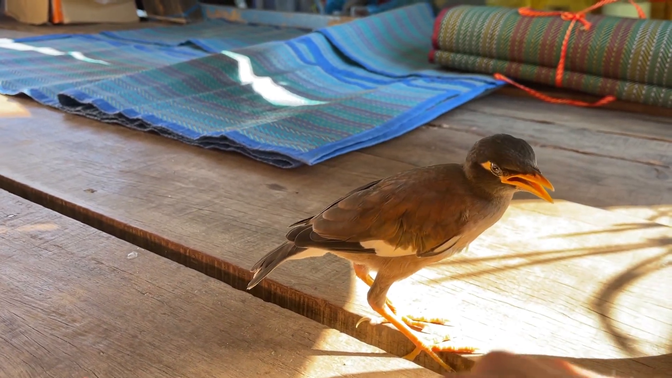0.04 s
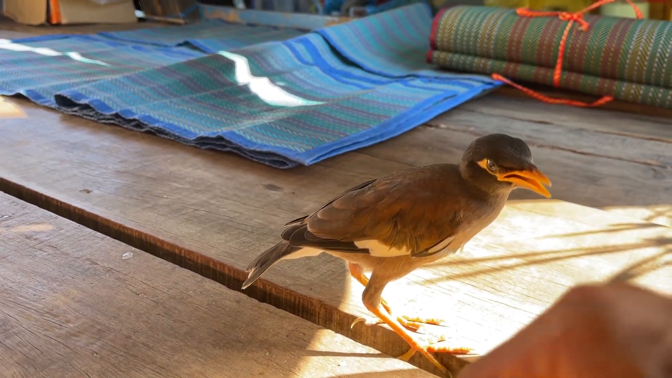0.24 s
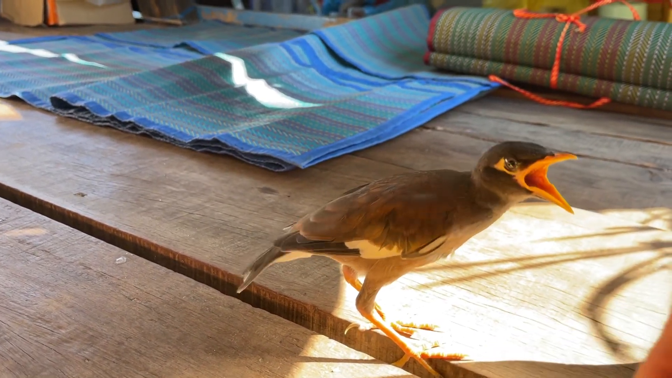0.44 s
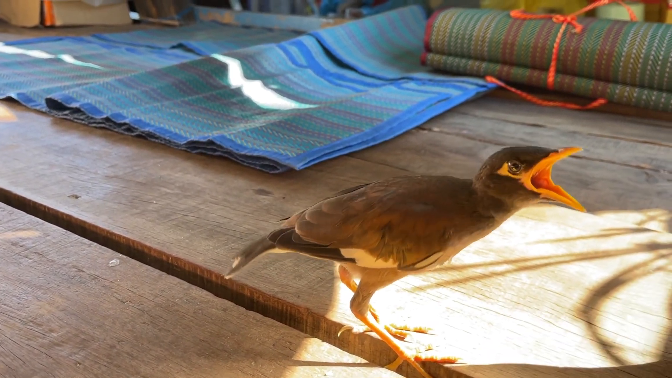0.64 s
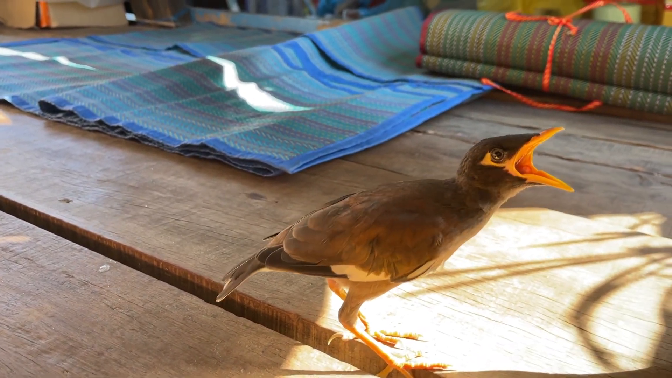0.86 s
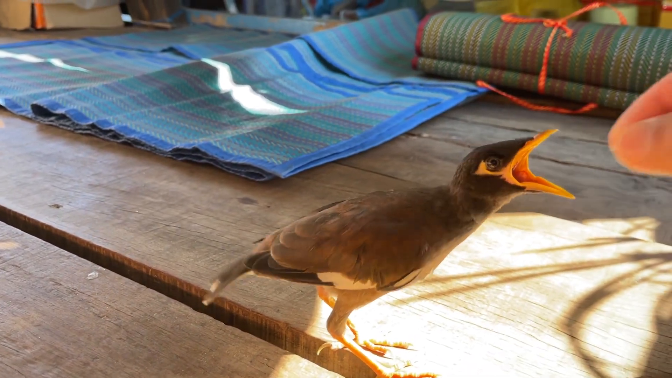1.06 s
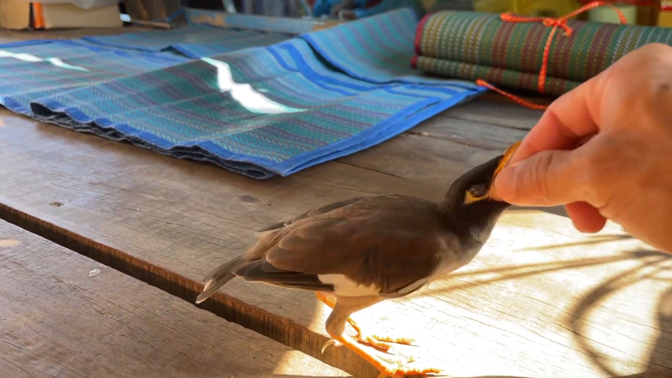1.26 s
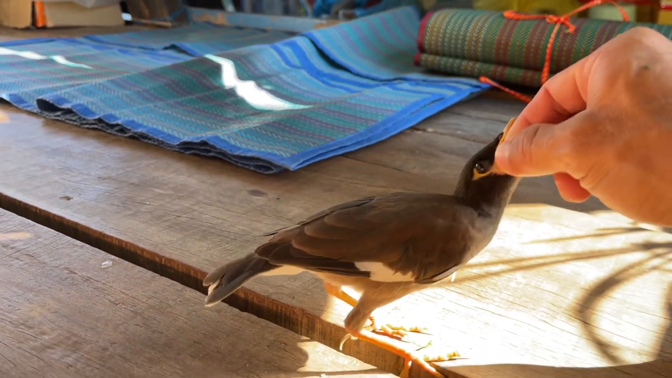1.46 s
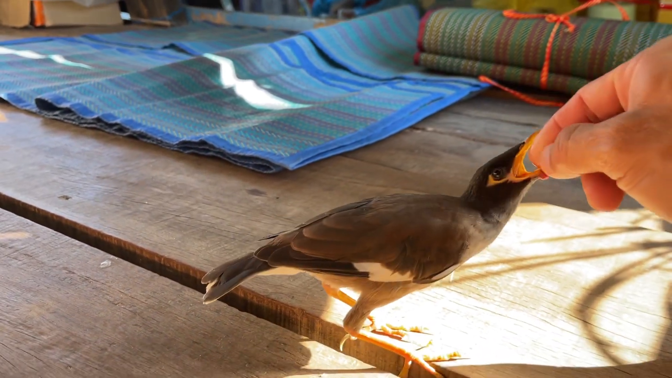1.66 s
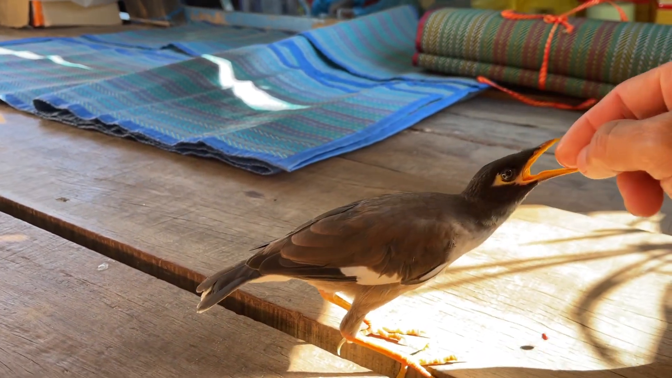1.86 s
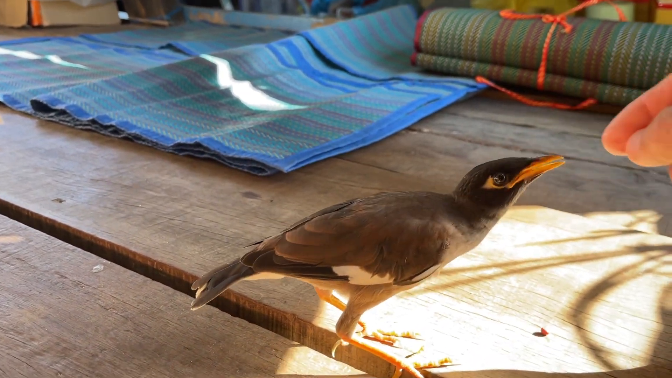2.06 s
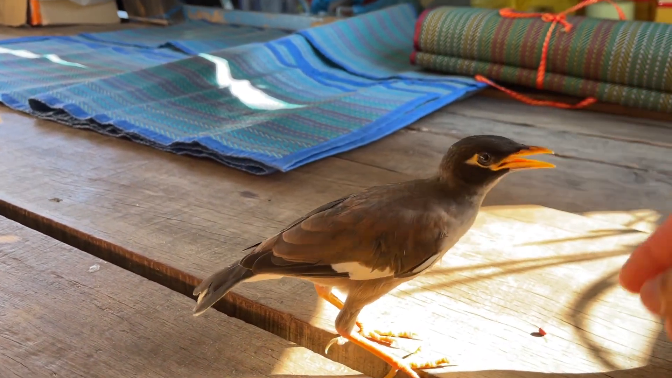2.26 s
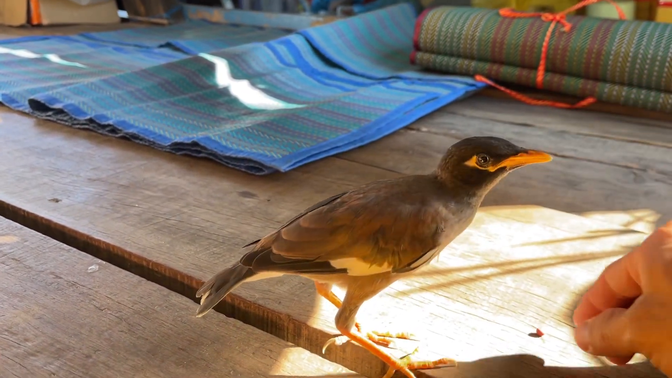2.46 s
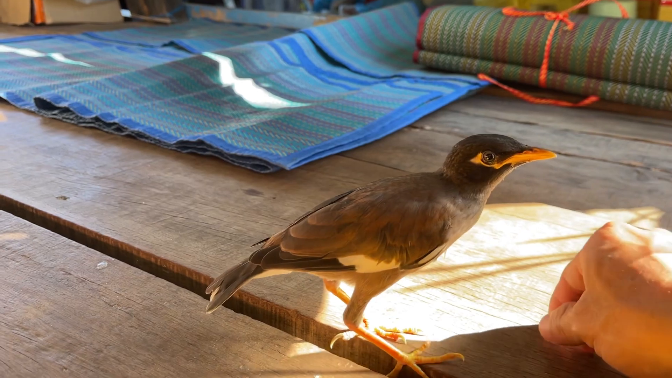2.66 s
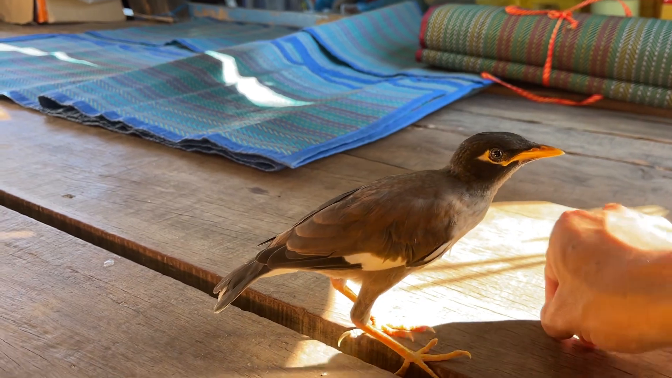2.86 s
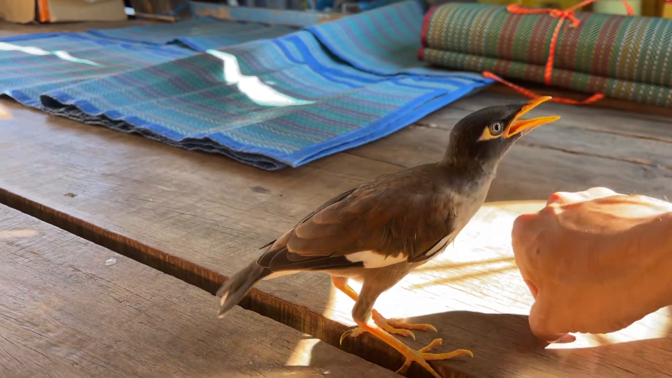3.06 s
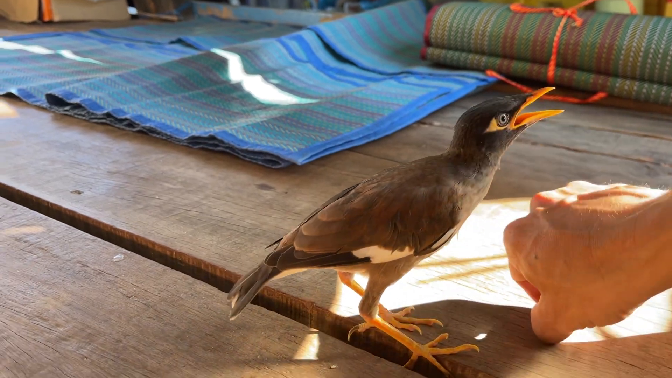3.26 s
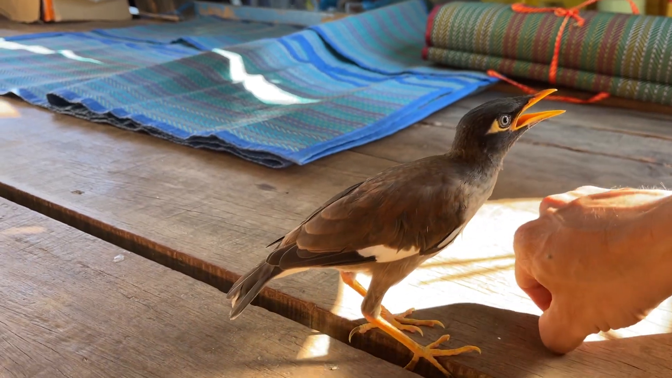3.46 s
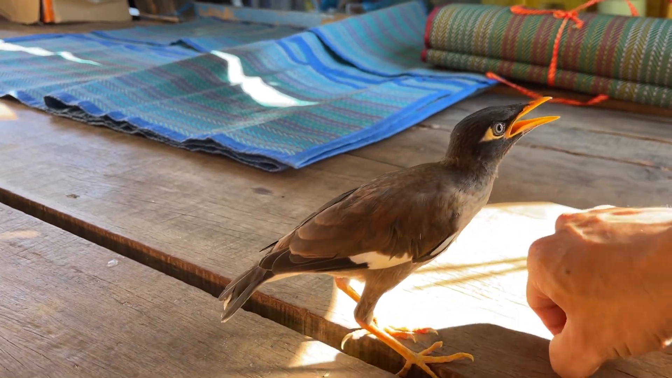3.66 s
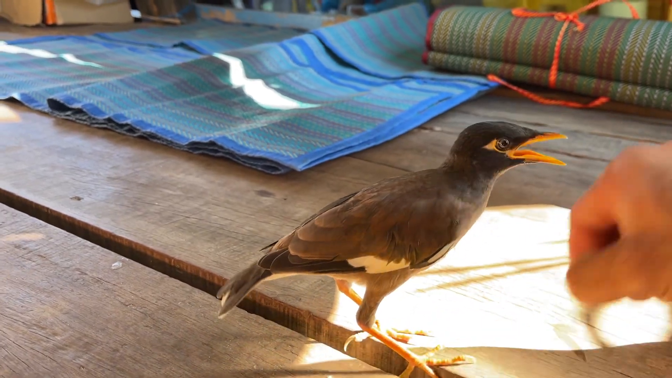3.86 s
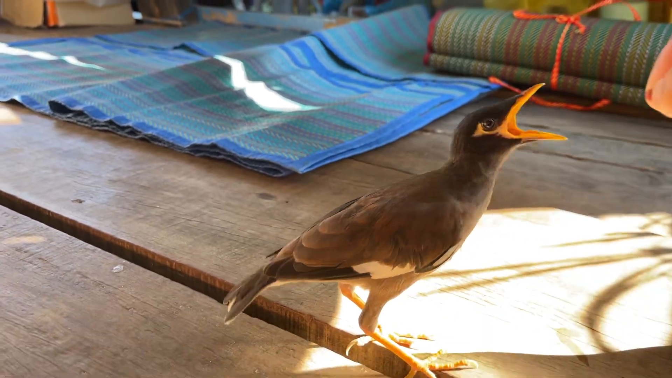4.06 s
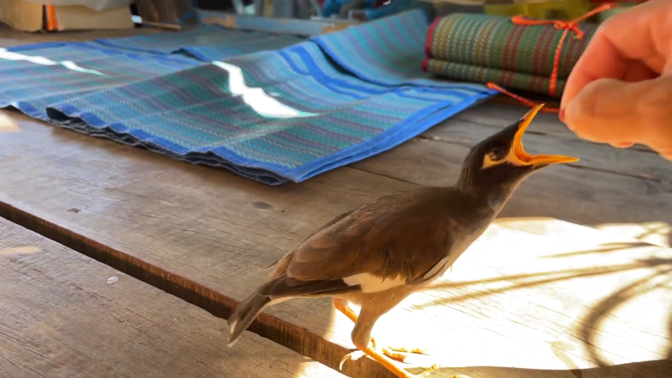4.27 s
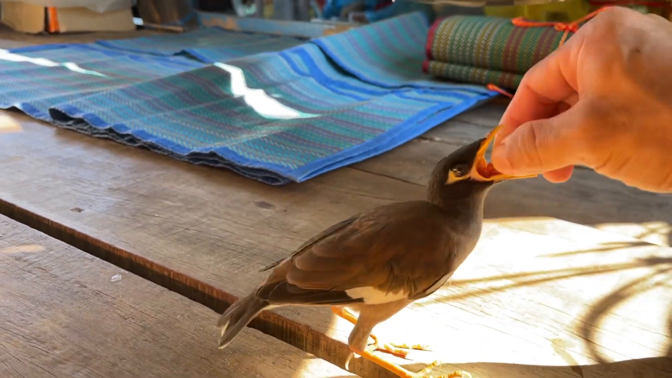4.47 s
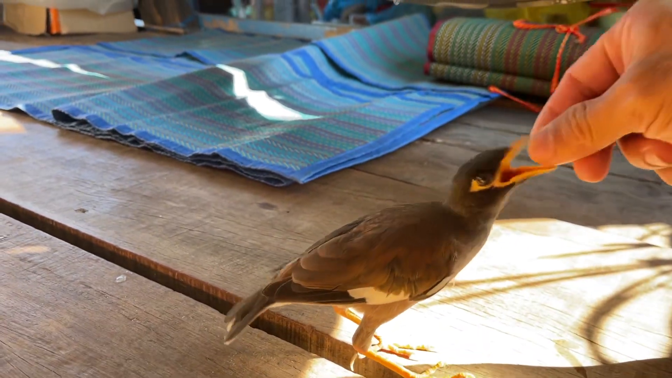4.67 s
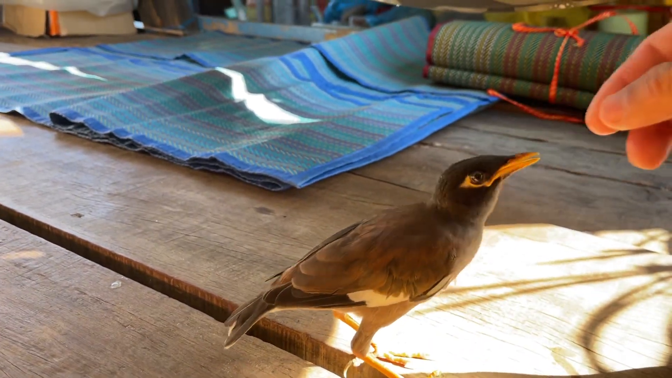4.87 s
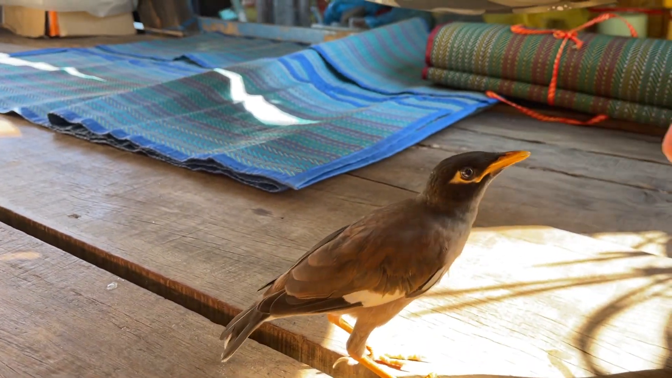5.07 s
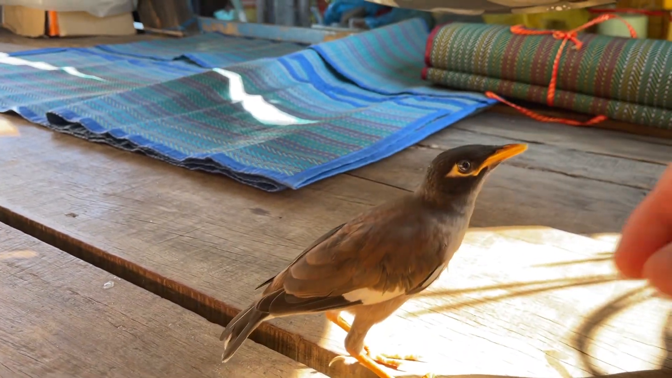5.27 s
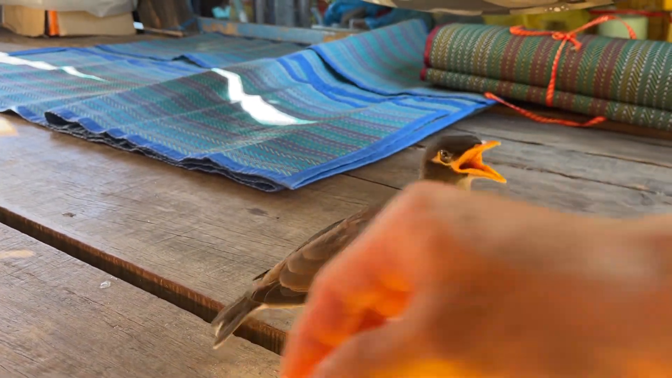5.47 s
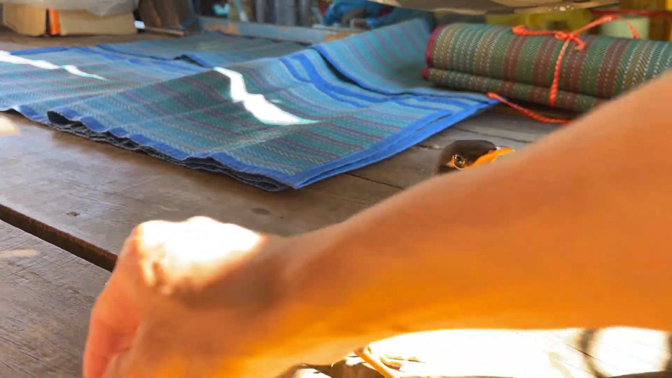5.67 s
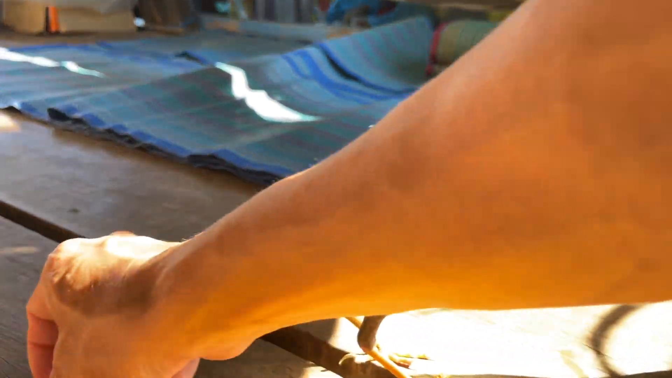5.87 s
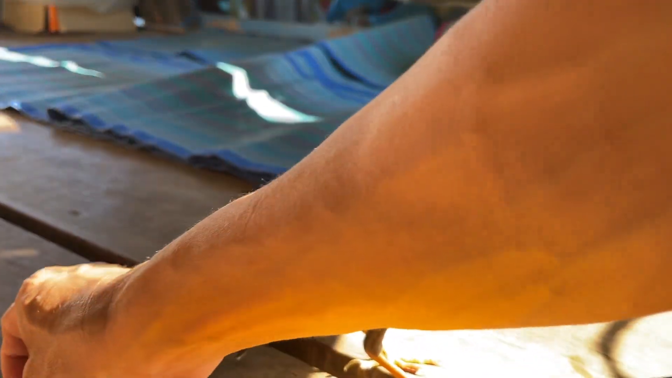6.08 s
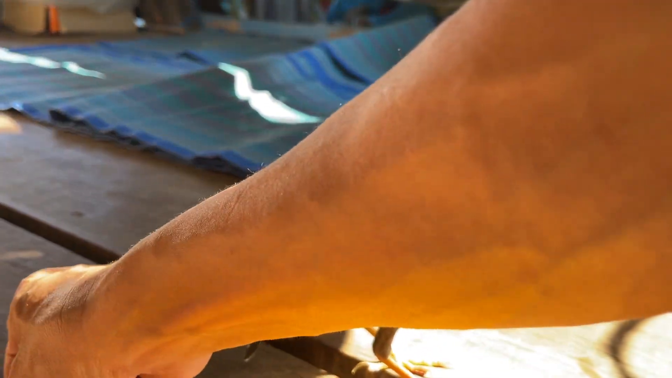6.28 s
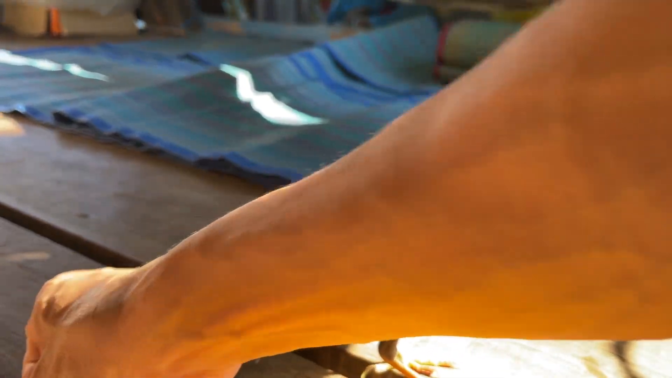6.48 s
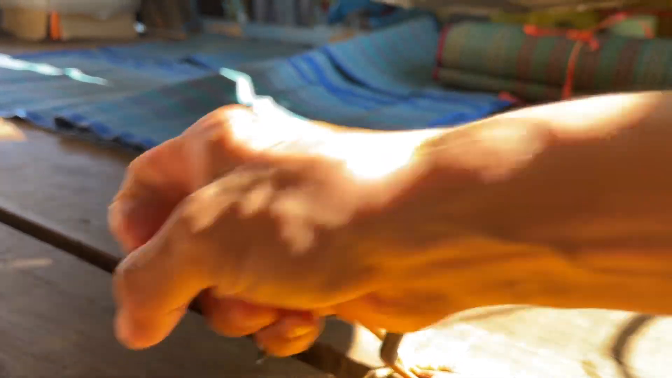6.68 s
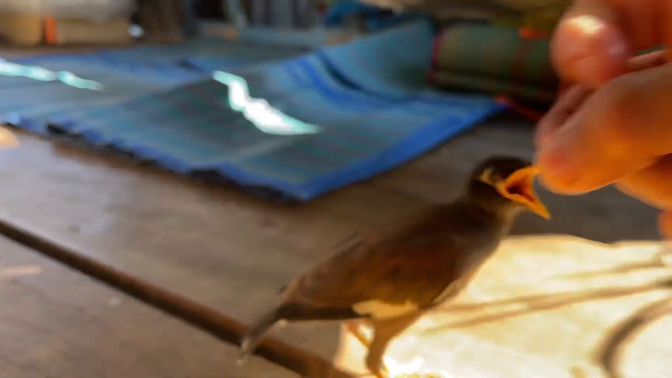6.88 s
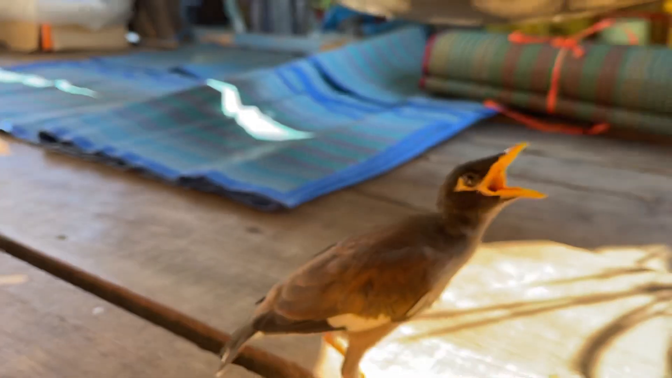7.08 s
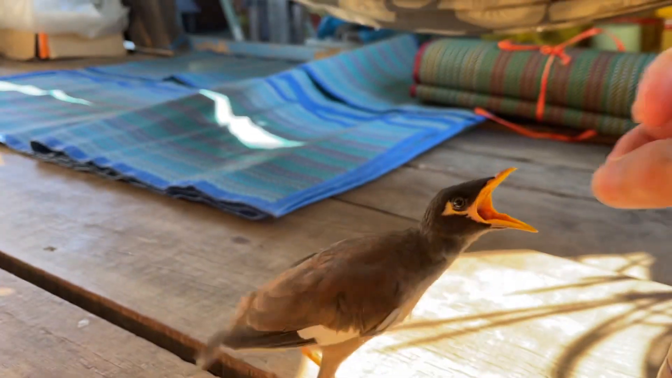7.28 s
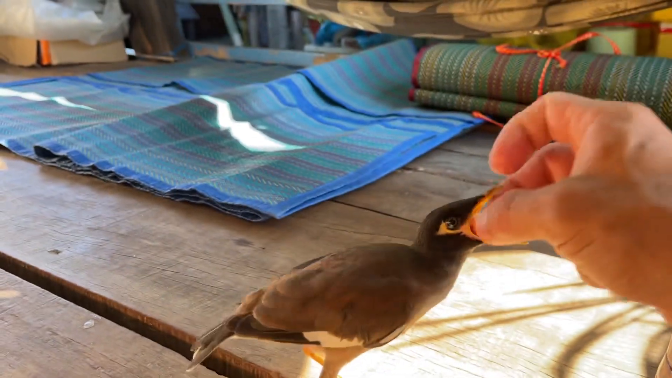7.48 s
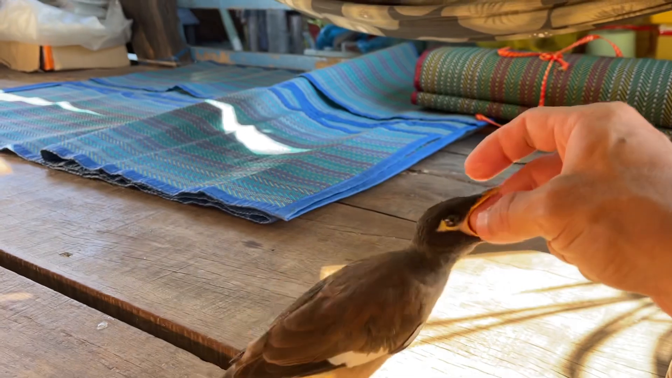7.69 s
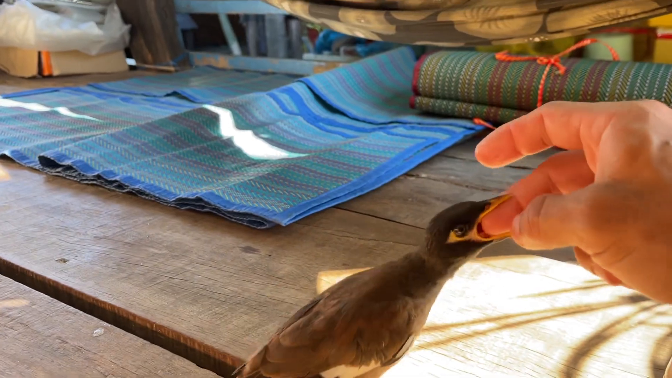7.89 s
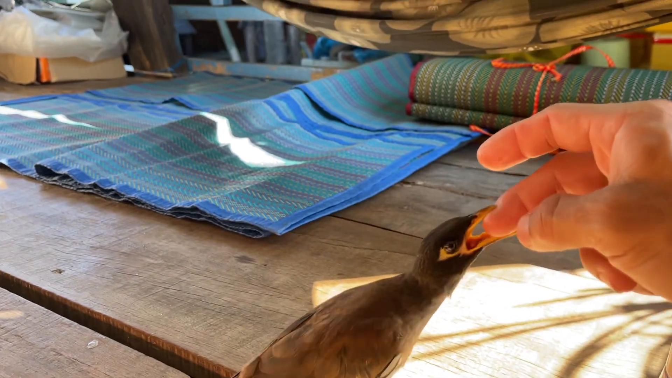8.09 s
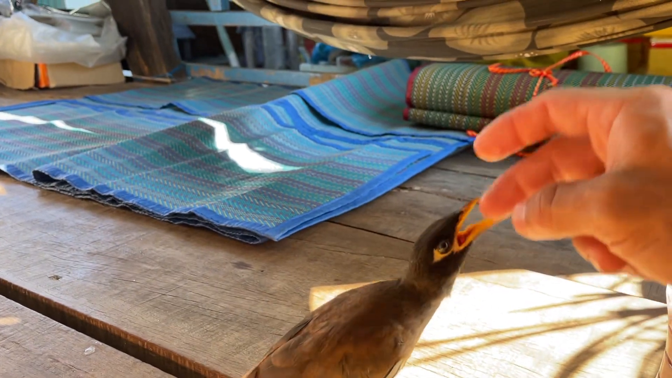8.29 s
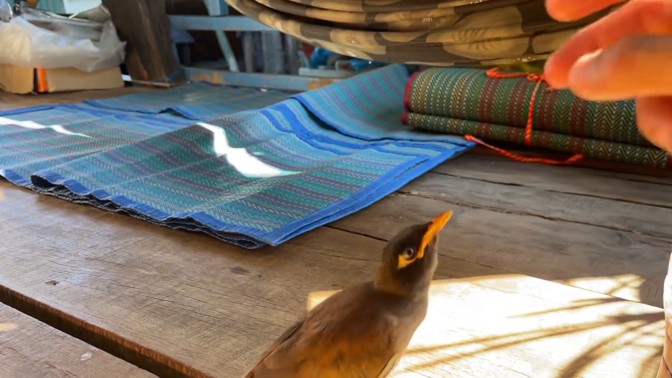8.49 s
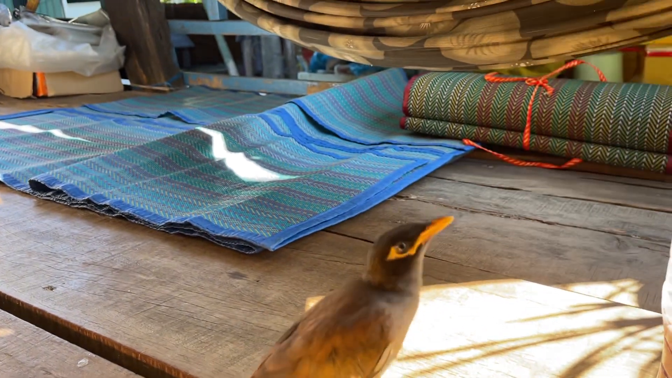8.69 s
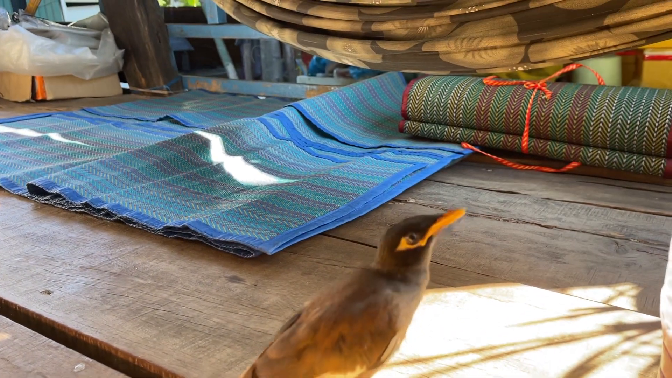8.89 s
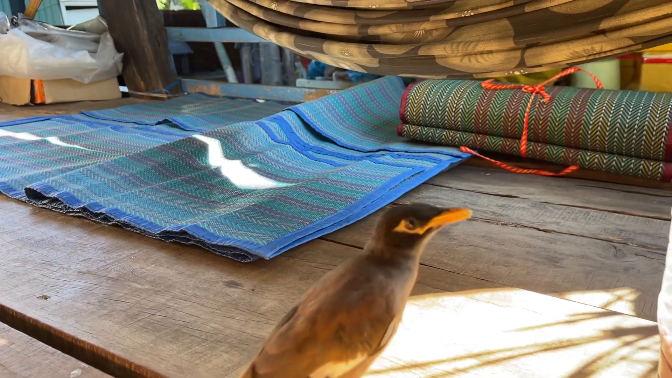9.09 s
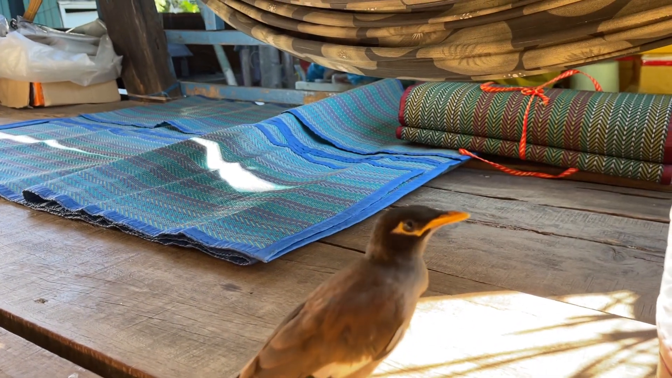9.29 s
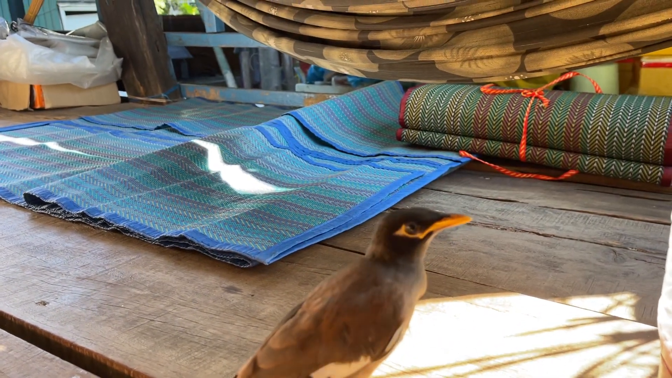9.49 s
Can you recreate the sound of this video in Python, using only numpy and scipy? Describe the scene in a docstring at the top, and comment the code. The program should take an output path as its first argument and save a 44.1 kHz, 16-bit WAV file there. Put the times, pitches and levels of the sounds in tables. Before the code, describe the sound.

A begging bird close to the microphone gives short, harsh, rasping chirps, each a fast double-arched squawk ending in a brief whistle. They come in hurried runs separated by short gaps. Between early runs, one sharp tick and soft brushing come from a hand on wooden boards. The calls stop after about seven and a half seconds, except one weak late peep. A low distant rumble lies beneath in a dry, open wooden room.

```python
"""A wooden floor in an open room, where a myna begs for food in quick runs of short rasping calls.
Each call is one double-arched gesture of two sine voices, the two sides of its syrinx.
They clash into sum tones, and filtered noise chopped by their beat adds the rasp.
Between the runs a feeding hand makes sharp ticks and soft brushes, both from shaped noise bursts.
Behind lie an outdoor rumble of coloured noise and faint far-off whistles of gliding sines."""
import sys
import numpy as np
from scipy import signal
from scipy.fft import rfft, irfft
from scipy.io import wavfile

SR = 44100
rng = np.random.default_rng(int(sys.argv[2]) if len(sys.argv) > 2 else 0)


def wav_out(sig):
    """Save sig, one row per channel (or a flat mono array), as 16-bit PCM at SR to the path in sys.argv[1]."""
    wavfile.write(sys.argv[1], SR, np.round(np.clip(np.atleast_2d(sig).T, -1, 1) * 32767).astype(np.int16))


N = 420713  # length in samples


def amp(db):
    """Decibels to gain."""
    return 10 ** (np.asarray(db) / 20)


def unit(x):
    """Scales to rms 1."""
    return x / np.sqrt(np.mean(x ** 2) + 1e-20)


def read(points, hz):
    """Reads a table on a log-frequency axis."""
    f, value = np.transpose(points)
    return np.interp(np.log(hz + 1), np.log(f + 1), value)


def add(mix, start_s, sound):
    """Mixes a sound in at a time."""
    part = mix[round(start_s * SR):][:len(sound)]
    part += sound[:len(part)]


def noise(count, shape):
    """Noise of rms 1: a white spectrum multiplied by shape(Hz)."""
    spectrum = rfft(rng.standard_normal(count))
    return unit(irfft(spectrum * shape(np.fft.rfftfreq(count, 1 / SR)), count))


def band(hz, width_hz):
    """The spectral shape of one broad resonance."""
    return lambda f: 1 / (1 + (2 * (f - hz) / width_hz) ** 2)


def wobble(count, rate_hz):
    """Random drift of rms 1, up to about the given rate."""
    return noise(count, lambda f: 1 / (1 + (f / rate_hz) ** 4))


# The colour of the background. Each row: frequency in Hz, density in dB per Hz before overall scaling.
AIR_COLOUR = [(20, -27.5), (33, -11), (47, 4.5), (62, 1), (130, -2.5), (250, -8.5), (400, -16.5),
              (600, -23.5), (1100, -25.5), (2000, -32), (4000, -41), (7000, -42.5), (9600, -46.5),
              (11200, -28), (11600, -42.5), (11900, -72.5)]
# How alike the background is in both ears. Each row: frequency in Hz, left-right likeness (1 = identical).
AIR_LIKENESS = [(50, 0.97), (220, 0.97), (450, 0.62), (900, 0.095), (2500, 0.44), (7000, 0.11), (8500, 1),
                (11500, 0.98)]
AIR_DB = -50.5


def background(thrum_db=-47, thrum_hz=42):
    """Distant rumble under faint hiss, as partly shared stereo noise; a deep thrum fades out early."""
    hz, t = np.fft.rfftfreq(N, 1 / SR), np.arange(N) / SR
    left, other = rfft(rng.standard_normal((2, N)))
    same = np.clip(read(AIR_LIKENESS, hz), -1, 1)
    right = same * left + np.sqrt(1 - same ** 2) * other
    air = unit(irfft(np.array([left, right]) * amp(read(AIR_COLOUR, hz)), N))
    # the level drifts a little and sinks gently through the middle
    air_db = AIR_DB + .6 * wobble(N, 4.1) + np.interp(t, [3, 8], [.8, -.8])
    thrum = noise(N, lambda f: band(thrum_hz, 16)(f) ** 2)
    thrum *= np.interp(t, [.2, .6], [1, 0])
    return air * amp(air_db) + amp(thrum_db) * thrum


def whistles(rows, waver=.015, flutter_db=3):
    """Thin sines that glide, waver in pitch and flutter in level."""
    out = np.zeros(N)
    for start_s, length_s, db, start_hz, end_hz in rows:
        count = int(length_s * SR)
        hz = np.linspace(start_hz, end_hz, count) * (1 + waver * wobble(count, 56))
        level = amp(db + flutter_db * wobble(count, 25)) * signal.windows.tukey(count, .7)
        add(out, start_s, level * np.sin(2 * np.pi * np.cumsum(hz) / SR))
    return out


# Faint whistles and a hoot. Each row: start in seconds, length in seconds, level in dB,
# start pitch in Hz, end pitch in Hz.
FAR_CALLS = [(6.45, 0.33, -77, 2930, 2970), (8.86, 0.29, -70, 687, 674), (8.93, 0.21, -71, 1190, 1192),
             (9.15, .39, -79.5, 2946, 2960), (9.17, 0.27, -84.5, 5850, 6020)]


def far_calls():
    """Far-off whistles and a hoot: faint gliding sines with a strong flutter."""
    return whistles(FAR_CALLS, waver=0.012, flutter_db=6.5)


# Claws, fingers and food on the boards. Each row: start in seconds, level in dB before the decay,
# centre in Hz, width in Hz, decay in seconds.
TICKS = [(1.858, -38.5, 6850, 9100, 0.0027), (2.411, -54, 3430, 6100, 0.029),
         (2.447, -51, 4000, 6000, 0.0034), (2.577, -41, 1520, 700, 0.021),
         (2.898, -13.5, 8700, 1690, 0.0004), (2.907, -63, 5970, 6000, .004),
         (2.941, -52, 2420, 3000, 0.0038), (3.453, -49.5, 2160, 2500, 0.0044),
         (8.035, -64.5, 7900, 6000, .0047), (9.06, -64, 7970, 2494, 0.0064)]


def ticks(rows):
    """Small impacts: resonant noise bursts with a very fast onset and an exponential decay."""
    out, t = np.zeros(N), np.arange(SR // 6) / SR
    for start_s, db, hz, width_hz, decay_s in rows:
        envelope = np.exp(-t / decay_s) * (1 - np.exp(-t / .0001))
        add(out, start_s, amp(db) * noise(len(t), band(hz, width_hz)) * envelope)
    return out


# The hand over the boards. Each row: start in seconds, length in seconds, level in dB before the swell,
# centre in Hz, width in Hz.
BRUSHES = [(2.387, 0.43, -55.5, 1040, 1240), (2.42, 0.11, -49, 182, 50), (2.469, 0.094, -56, 7200, 6150),
           (2.63, 0.088, -56, 7400, 6150), (2.79, 0.055, -62, 7250, 6100), (2.868, 0.076, -56, 8500, 3980),
           (3.147, 0.35, -57.5, 6100, 6160), (3.224, 0.13, -60, 1130, 250), (8.883, 0.33, -68, 1000, 900)]


def brushes():
    """Soft friction: resonant noise that flutters in level, swells and fades."""
    out = np.zeros(N)
    for start_s, length_s, db, hz, width_hz in BRUSHES:
        count = int(length_s * SR)
        level = amp(db + 1.9 * wobble(count, 90)) * np.hanning(count)
        add(out, start_s, level * noise(count, band(hz, width_hz)))
    return out


# The bill snapping open at the start of some calls. Each row: start in seconds, level in dB before the decay.
SNAPS = [(0.589, -36.5), (.748, -28), (.957, -29), (4.193, -31), (4.3211, -27.5), (5.569, -27.5)]
SNAP_HZ, SNAP_WIDTH_HZ, SNAP_DECAY_S = 3800, 6600, 0.00085


def bill_snaps():
    """The bill snaps open: broad noise clicks that die away at once."""
    return ticks([(start_s, db, SNAP_HZ, SNAP_WIDTH_HZ, SNAP_DECAY_S) for start_s, db in SNAPS])


LEAP_GAP_S, LEAP_RISE_S, LEAP_FALL_S = .0205, .0048, .0058  # the second leap is the crest of the call
SAG_HZ_PER_S = 2300  # the closing note sinks a little


def pitch(t, voice_hz, closing_hz):
    """One voice, t counted from the crest: a leap and fall, then a higher leap to the closing note."""
    opening_hz, first_hz, crest_hz = voice_hz
    hz = opening_hz
    leaps = ((t + LEAP_GAP_S, first_hz, opening_hz), (t, crest_hz, closing_hz))
    for since, top, rest in leaps:
        leap = hz + (top - hz) * np.exp(-(since / LEAP_RISE_S) ** 2)
        fall = rest + (top - rest) / (1 + (since / LEAP_FALL_S) ** 2)
        hz = np.where(since < 0, leap, fall)
    return hz - SAG_HZ_PER_S * np.maximum(t, 0)


def voice_phase(hz, rough):
    """Phase of one side of the syrinx: its pitch drifts and jitters in step with the roughness."""
    drift = .035 * wobble(len(hz), 80)
    jitter = .02 * wobble(len(hz), 1300)
    return 2 * np.pi * np.cumsum(hz * (1 + rough * (drift + jitter))) / SR


FIRST_SHARE, SWELL_POWER = 0.068, 1.18  # the attack starts at this share; the power bends the whole swell


def swell(t, db, attack_s, release_s):
    """Attack, hold and release over the length of a call."""
    attack = np.clip(FIRST_SHARE + (1 - FIRST_SHARE) * (t - t[0]) / attack_s, 0, 1)
    release = np.clip((t[-1] - t) / release_s, 0, 1)
    return amp(db) * (attack * release) ** SWELL_POWER


# The pitch steps of each voice. In order: opening in Hz, top of the first leap in Hz, top of the second in Hz.
LOW_VOICE_HZ = (1430, 2189, 2816)
HIGH_VOICE_HZ = (2750, 4157, 4840)
# A voice is loud where its pitch meets a throat resonance. Each row: frequency in Hz, gain in dB.
THROAT = [(1400, -7), (1800, -3), (2300, -5), (2800, -5.5), (3100, -10.5), (3500, -7.5), (3900, 2),
          (4800, 0)]
# How the low voice, high voice, sum tones and rasp swell and fade, in that order.
# Each row: level in dB, attack in seconds, release in seconds.
PARTS = [(-1.5, 0.022, 0.022), (0, .045, 0.019), (-3.5, .033, 0.024), (-6, 0.015, 0.031)]
# Tones born where the voices clash. Each row: multiple of the low voice, multiple of the high, level in dB.
SUM_TONES = [(1, 1, -7), (0, 2, -7.5), (2, 1, -11.5), (1, 2, -10), (2, 0, -16.5), (2, 2, -14.5),
             (0, 3, -13.5), (3, 1, -11), (3, 0, -18), (-1, 1, -18.5)]
# The open bill passes the tones up to the high treble. Each row: frequency in Hz, gain in dB.
BILL = [(600, -33), (1300, -15.5), (1700, -2), (9000, -2.5), (11500, -4.5), (12600, -10), (13600, -28.5),
        (15500, -36.5), (16500, -54.5)]
# Turbulence in the open throat. Each row: frequency in Hz, density in dB per Hz before overall scaling.
RASP = [(300, -42), (640, -13), (1000, -35), (1350, -22), (1750, 3.5), (2400, -2), (3100, -3), (3800, 3),
        (4800, 1.5), (6300, 8), (9000, -5), (11000, 1), (12400, -9.5), (13600, -29), (15500, -37),
        (16500, -56)]
# Soft calls ease in, loud ones burst. Each row: effort in dB, fade-in in seconds.
EASE_IN = [(-26.5, 0.016), (-21.5, 0.0034)]
OVERHANG_S = .006  # the parts die this long after the end
CLEAR_S, CLOSING_ROUGH = .016, .3  # after the crest the rough voices clear into a whistle
EASY_DB, LOW_SHARE_SLOPE = -25.5, 0.54  # per dB of effort above easy, the low voice loses this many dB
CREST_DIP_DB = -5  # the sum tones thin out at the crest


def call(start, crest, end, effort_db, low_hz, high_hz, bright_db, sum_db, falter_db=2.5, turns_db=5.0):
    """Two voices arch twice and settle on a closing whistle; their beat chops the rasp."""
    t = np.arange(start, end + OVERHANG_S, 1 / SR) - crest
    count = len(t)
    closing = np.clip(t / CLEAR_S, 0, 1)
    rough = 1 + (CLOSING_ROUGH - 1) * closing
    low_path, high_path = pitch(t, LOW_VOICE_HZ, low_hz), pitch(t, HIGH_VOICE_HZ, high_hz)
    low, high = voice_phase(low_path, rough), voice_phase(high_path, rough)
    low_gain, high_gain, sum_gain, rasp_gain = (swell(t, *part) for part in PARTS)

    # each voice falters on its own, most while the call is rough
    low_db = read(THROAT, low_path) - LOW_SHARE_SLOPE * (effort_db - EASY_DB)
    low_gain = low_gain * amp(low_db + falter_db * rough * wobble(count, 250))
    high_gain = high_gain * amp(read(THROAT, high_path) + falter_db * rough * wobble(count, 250))
    tones = low_gain * np.sin(low) + high_gain * np.sin(high)

    # the sum tones take turns to stand out; sum_db sets the plain sum in the closing note
    crest_dip_db = CREST_DIP_DB * np.exp(-(t / LEAP_RISE_S) ** 2)
    sum_gain = sum_gain * amp(crest_dip_db + 0.41 * bright_db)
    for j, k, db in SUM_TONES:
        db = db + (j == k == 1) * sum_db * closing + turns_db * wobble(count, 53)
        tones += sum_gain * amp(db) * np.sin(j * low + k * high + .12 * wobble(count, 500))
    bill = amp(read(BILL, np.fft.rfftfreq(count, 1 / SR)))
    tones = np.sqrt(2) * irfft(rfft(tones) * bill, count)

    # brightness tilts the rasp up between 4 and 9 kHz
    rasp = noise(count, lambda f: amp(read(RASP, f) + bright_db * read([(4000, 0), (9000, 1)], f)))
    beat = unit(1 + 0.19 * np.cos(high - low) + 0.48 * wobble(count, 380))
    rasp *= rasp_gain * amp(0.32 * bright_db) * beat
    rise_s = np.interp(effort_db, *np.transpose(EASE_IN))
    return amp(effort_db) * (tones + rasp) * np.minimum((t - t[0]) / rise_s, 1)


# The opening whistle is louder in a call slow to crest. Each row: run-up in seconds, dB against the effort.
OPENING_LEVEL = [(.040, -25), (.044, -11)]
# The two-voiced peep that leads into the last call. Each row: start in seconds, length in seconds,
# level in dB, start pitch in Hz, end pitch in Hz.
PEEP = [(8.411, 0.023, -45, 1870, 2205), (8.413, .019, -35.5, 3525, 3800)]
OPENING_FROM_HZ, OPENING_TO_HZ, OPENING_GAP_S = 2350, 2850, 0.021  # it stops this long before the crest


def openings():
    """A short rising sine whistle in the run-up of each call, plus the peep before the last."""
    rows = []
    for start, crest, end, effort_db, *colour in CALL_ROWS:
        run_up_s = crest - start
        db = effort_db + np.interp(run_up_s, *np.transpose(OPENING_LEVEL))
        rows.append((start, run_up_s - OPENING_GAP_S, db, OPENING_FROM_HZ, OPENING_TO_HZ))
    return whistles(rows + list(PEEP), waver=.012, flutter_db=4.0)


# The begging calls. Each row: start in seconds, crest in seconds, end in seconds, effort in dB,
# closing pitch of the low voice in Hz, closing pitch of the high voice in Hz, brightness in dB,
# lift of the plain sum tone in the closing note in dB.
CALL_ROWS = [(0.26, 0.3012, 0.328, -25.5, 2182.0, 3503.0, 2.5, 6.5),
             (0.353, 0.393, 0.421, -22, 1816.0, 3266.0, 3, 8),
             (0.454, 0.495, 0.528, -21.0, 1796.0, 3190.0, 6.5, 9.5),
             (0.586, 0.6306, 0.6653, -22, 1835.0, 3323.0, 2, 12.5),
             (0.745, 0.786, 0.824, -25.5, 1947.0, 3820.0, -3, -3.0),
             (0.956, 0.997, 1.027, -24.5, 2395.0, 3880.0, -2.5, 5),
             (1.07, 1.111, 1.143, -19.0, 2304.0, 3530.0, 1.5, -5),
             (1.164, 1.202, 1.2332, -20.5, 2260.0, 3154.0, 6.0, 0),
             (1.292, 1.333, 1.365, -24.5, 2129.0, 3510.0, -3.5, -6.0),
             (2.078, 2.1188, 2.1438, -31.5, 2348.0, 3873.0, -5.5, 10.5),
             (2.197, 2.2422, 2.2762, -30.5, 2083.0, 3507.0, -0.5, 9),
             (3.017, 3.06, 3.094, -27.5, 2130.0, 3686.0, -1.5, 5.0),
             (3.133, 3.176, 3.211, -23.5, 1940.0, 2896.0, -3.5, 5),
             (3.685, 3.725, 3.759, -25.5, 2007.0, 2850.0, -5.0, 6.0),
             (3.823, 3.867, 3.902, -25, 2060.0, 3067.0, 1, 2.0),
             (3.951, 3.993, 4.029, -23.0, 1813.0, 3520.0, 2.5, 1),
             (4.072, 4.115, 4.151, -22.0, 2122.0, 3200.0, 1.0, 0),
             (4.192, 4.2362, 4.2667, -20.5, 2127.0, 3380.0, 1.5, 1),
             (4.318, 4.363, 4.3994, -21, 2163.0, 3127.0, 4.5, -5),
             (4.618, 4.66, 4.69, -20.5, 2176.0, 3510.0, -3.0, 5.5),
             (5.443, 5.481, 5.515, -25, 2128.0, 3710.0, 9, 7.0),
             (5.567, 5.612, 5.6492, -25.5, 1816.0, 2990.0, 9, -7.5),
             (5.773, 5.817, 5.853, -28, 1992.0, 3615.0, 4, 2.5),
             (6.241, 6.277, 6.312, -26.5, 2124.0, 3654.0, -2, 6),
             (6.354, 6.395, 6.434, -22.5, 1809.0, 3094.0, 1.5, 3.5),
             (6.704, 6.743, 6.777, -26, 2310.0, 3960.0, -1.5, 10.5),
             (6.814, 6.8527, 6.8873, -22.5, 2004.0, 3210.0, -4, 5.5),
             (7.039, 7.082, 7.115, -25.0, 2177.0, 3650.0, -3.5, 11),
             (7.167, 7.208, 7.2448, -23.0, 2056.0, 3630.0, -1, 6),
             (7.275, 7.3134, 7.3483, -20, 2014.0, 3570.0, 3.5, 6),
             (7.377, 7.412, 7.449, -21, 1886.0, 3600.0, 6.5, 5.5),
             (7.516, 7.56, 7.593, -24.5, 2125.0, 3860.0, -8, -10.0),
             (8.414, 8.464, 8.4876, -30, 2154.0, 3580.0, -16, -15)]
SCATTER_DB = -10  # sound scattered by the boards, against the direct sound


def myna():
    """All the calls; the head moves, so the boards scatter each one differently to each side."""
    out, t = np.zeros((2, N)), np.arange(SR // 50) / SR
    for row in CALL_ROWS:
        sound = call(*row)
        for side in out:
            scatter = rng.standard_normal(len(t)) * np.exp(-t / .0025)
            scatter *= amp(SCATTER_DB) / np.linalg.norm(scatter)
            scatter[0] += 1  # the direct sound
            add(side, row[0], signal.fftconvolve(sound, scatter))
    return out


# How long the room rings. Each row: frequency in Hz, time to fall 60 dB in seconds.
ROOM_T60 = [(500, .2), (2000, 0.18), (5500, 0.29), (9000, 0.13), (14000, 0.28)]
# Walls and things near by. Each row: delay in seconds, left level in dB, right level in dB.
ECHOES = [(.0063, -22, -19.5), (0.0118, -16, -19.5), (0.0224, -22, -25)]


def room(x, tail_db=-20):
    """Direct sound, a few reflections and a short faint tail of noise decaying band by band."""
    t = np.arange(SR // 2) / SR
    hz, s, z = signal.stft(rng.standard_normal((2, len(t))), SR, nperseg=256)
    decay = amp(-60 * s / read(ROOM_T60, hz)[:, None])
    tail = signal.istft(z * decay, SR, nperseg=256)[1][:, :len(t)]
    tail *= np.minimum(t / 0.0009, 1)
    response = amp(tail_db) * tail / np.linalg.norm(tail[0])
    response[:, 0] += 1
    for delay_s, left_db, right_db in ECHOES:
        response[:, round(delay_s * SR)] += amp([left_db, right_db])
    return signal.fftconvolve(x, response, axes=1)[:, :N]


def scene():
    """Bird, hand and far-off calls in the room, over the background."""
    bird = myna() + openings() + bill_snaps()
    hand = ticks(TICKS) + brushes()
    return room(bird + hand + far_calls()) + background()


# Phase between the two microphone ports. Each row: frequency in Hz, lead of the left in radians.
PORT_PHASE = [(0, 0), (900, 0), (1450, -.8), (2100, 0), (3700, .7), (6700, .15), (7600, .7), (8400, 0),
              (8900, -.1), (9800, -2.9), (10400, -3.3), (11700, -6.2), (12400, -6.4), (16000, -14.5)]
# Level between the two ports. Each row: frequency in Hz, left over right in dB.
PORT_BALANCE = [(100, 1.4), (700, 1.5), (1550, -2), (2400, 1.5), (5000, 1.4), (7300, 1.5), (8300, 0)]
EDGE_HZ = 16500


def record(dry):
    """The two ports differ in phase and level, half on each side; then a low-pass limits the band."""
    hz = np.fft.rfftfreq(N, 1 / SR)
    half_phase = np.exp(.5j * np.interp(hz, *np.transpose(PORT_PHASE)))
    half = amp(read(PORT_BALANCE, hz) / 2) * half_phase
    ports = irfft(rfft(dry) * np.array([half, 1 / half]), N)
    low_pass = signal.firwin(511, EDGE_HZ, window=("kaiser", 9), fs=SR)
    return signal.oaconvolve(ports, low_pass[None], "same")


dry = scene()
out = record(dry)
wav_out(out)
```